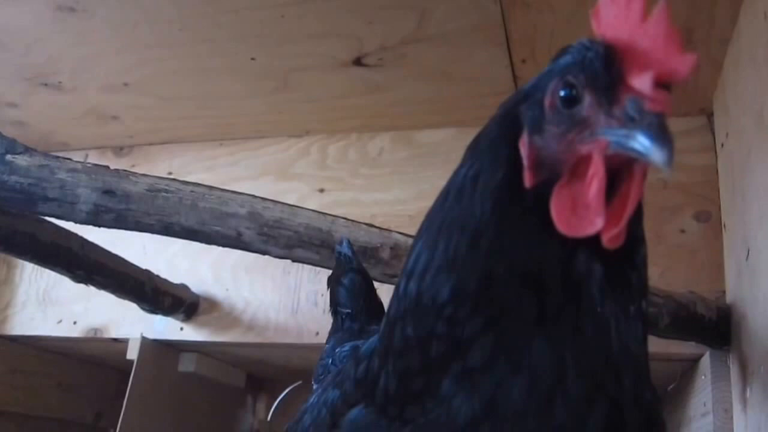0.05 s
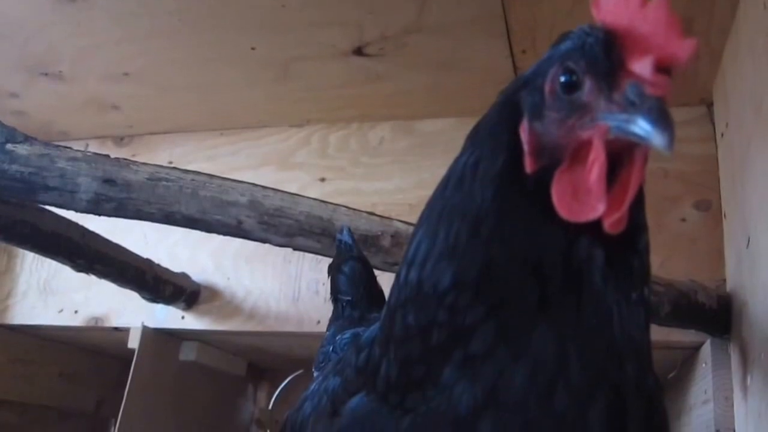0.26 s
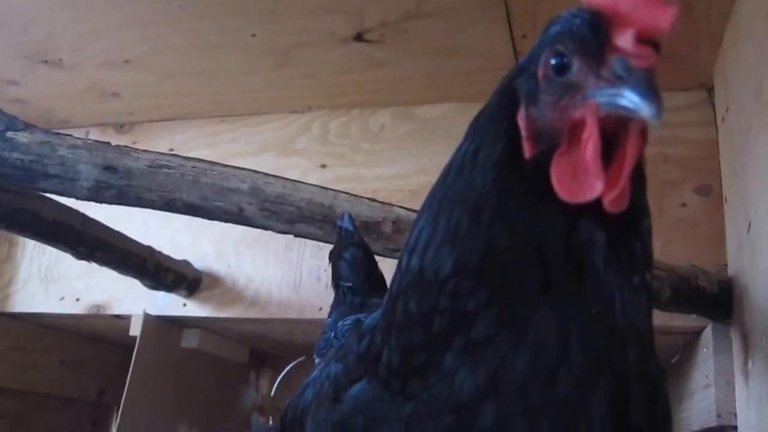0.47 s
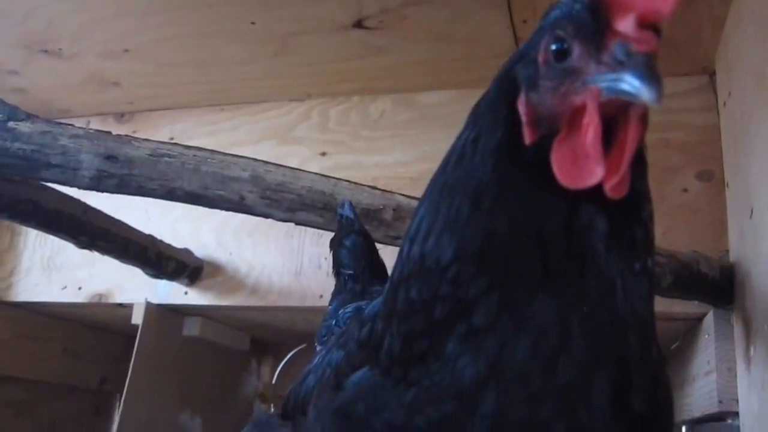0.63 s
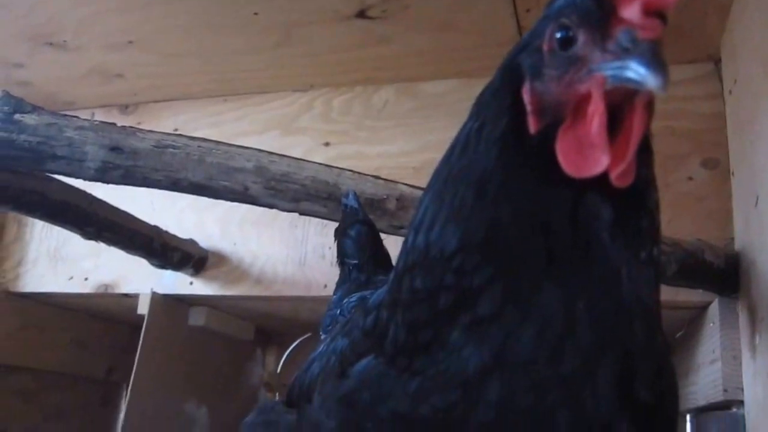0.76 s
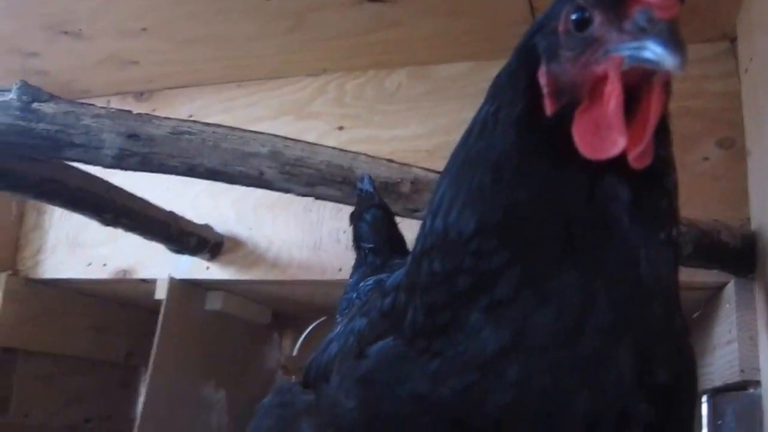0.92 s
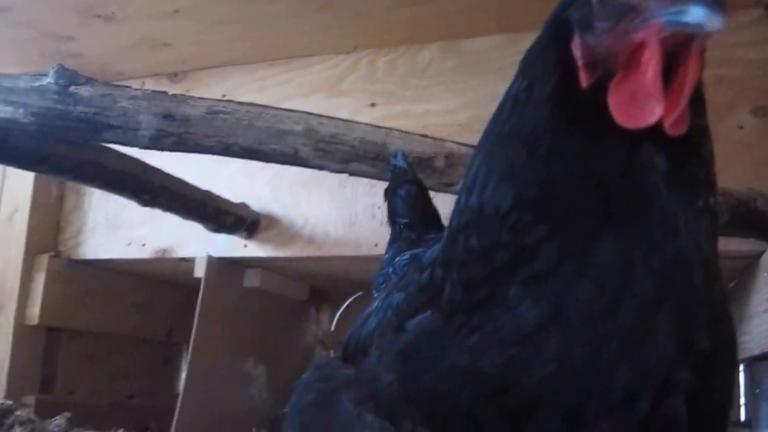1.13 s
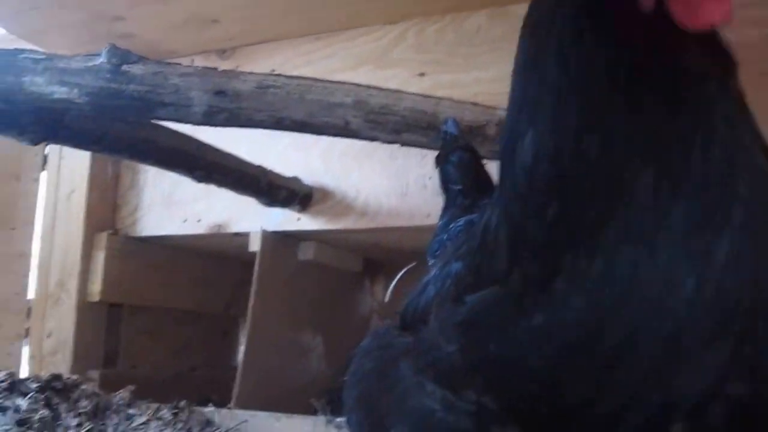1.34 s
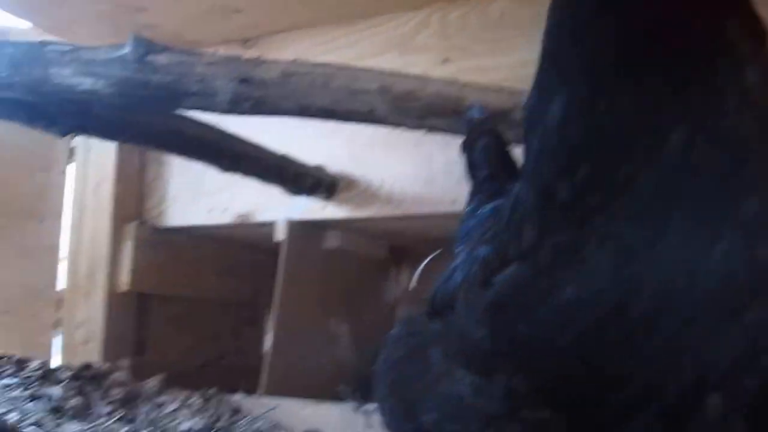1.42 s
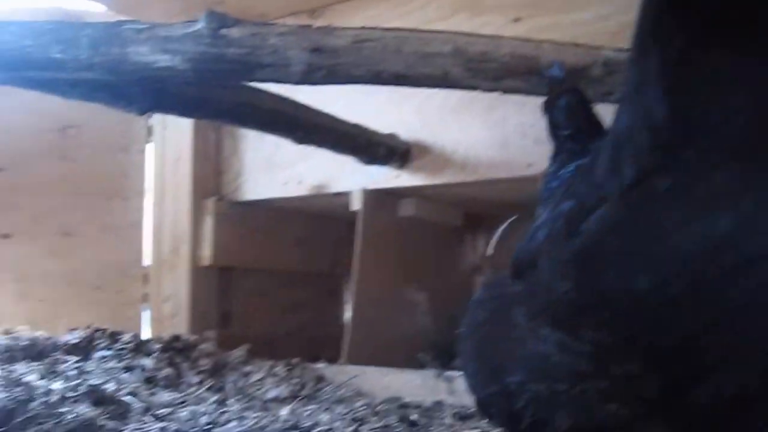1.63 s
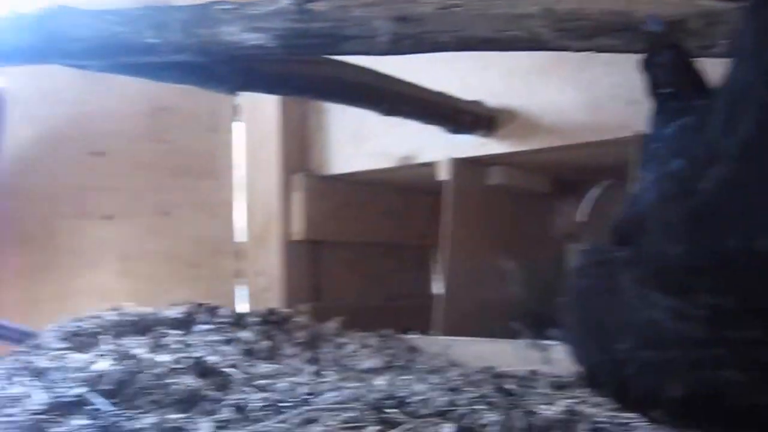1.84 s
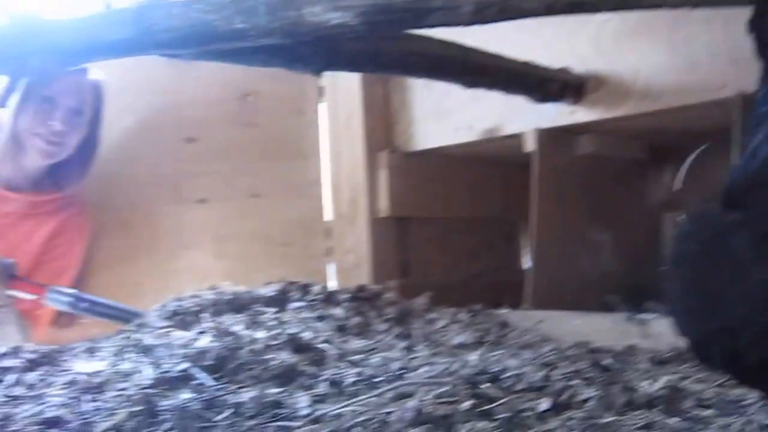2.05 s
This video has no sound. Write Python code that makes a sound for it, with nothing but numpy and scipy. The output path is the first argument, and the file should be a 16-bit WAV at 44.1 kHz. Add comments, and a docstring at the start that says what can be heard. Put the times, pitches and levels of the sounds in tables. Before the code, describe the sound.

From 0 to 0.5 s a nearby hen draws out a soft, raspy, slightly whistling call. A low motor hum and dull air continue throughout. Litter rustles faintly around 0.75 s; a distant bird calls faintly at 0.9. Five short hoarse clucks follow at about 1.1, 1.3, 1.5, 1.7 and 1.9 s, growing louder, with tiny ticks between. Knocks from 1.86 s and a close, left-leaning creak end it near 2.1.

```python
"""In a small plywood coop a hen draws out one soft, rasping call, then gives five quiet clucks that grow louder:
uneven pulses and puffs of noise ring in throat resonances. Outside, a motor hums as wavering shaft orders, with
a fluttering high sine whine above it; another bird, a glided band of noise, calls once, faintly. Shaped noise makes
the air and the rustling litter; filtered clicks make the ticks, the knocks on the camera body and, at the end,
a creak close to the microphone as the camera is turned."""
import sys
import numpy as np
from scipy import signal
from scipy.fft import rfft, irfft
from scipy.io import wavfile
from scipy.ndimage import uniform_filter1d

SR = 44100
rng = np.random.default_rng(int(sys.argv[2]) if len(sys.argv) > 2 else 0)


def generate_wav(sig):
    """Save sig (samples, or channels by samples) to the path in sys.argv[1] as 16-bit PCM at SR."""
    pcm = np.round(np.clip(np.atleast_2d(sig).T, -1, 1) * 32767).astype(np.int16)
    wavfile.write(sys.argv[1], SR, pcm)


N = 91948

# long call: pulse rate, its relative jitter, and share of puffed noise
CALL_PULSE_HZ, CALL_JITTER, CALL_AIR = 132.7, .2, .24
UPPER_WIDTH_HZ, UPPER_DB, RASP_DB = 210, -1.5, -2
TONE_OCTAVE_DB, TONE_JITTER = -9.5, .04
# clucks: jitter at full hoarseness, then total rise of low resonance and pulse rate as shares
CLUCK_JITTER, CLUCK_RISE, CLUCK_GLIDE = .27, .28, .14
CLUCK_ATTACK_S, CLUCK_RELEASE_S, LOW_WIDTH_HZ, HIGH_WIDTH_HZ = .014, .022, 220, 300
CHEST_HZ, CHEST_WIDTH_HZ, CHEST_DB = 400, 120, -16
BEAK_HZ, BEAK_WIDTH_HZ, BEAK_DB = 1700, 350, -18
# reverberation relative to the direct sound
HEN_ROOM_DB, CLICK_ROOM_DB = -7.5, -11
CASE_T60_S, CASE_DB = .012, -6
# handling and litter: overall gains, and left level over right
SLIP_DB, SLIP_PAN_DB, SLIP_LEAD_S = -2, 8, .00023
KNOCK_DB, KNOCK_PAN_DB = -5, .6
TICK_DB, TICK_PAN_DB = -26, -1.5
SHAFT_HZ, MOTOR_DRIFT, MOTOR_WAVER_DB = 17.83, .0027, -.08
WHINE_HZ, WHINE_DB, FLUTTER_HZ, FLUTTER_DEPTH = 8799, -76.5, 24, .85
# faint bird: the glide is the total rise as a share of its pitch
FAR_START_S, FAR_LENGTH_S, FAR_HZ, FAR_GLIDE, FAR_DB, FAR_WIDTH_HZ = .895, .125, 1540, .07, -60.5, 150
AIR_DB, AIR_PATCH_DB = -44.5, 1.5
NOTCH_HZ, NOTCH_WIDTH_HZ, EDGE_HZ = 8237, 327, 15950


def amp(db):
    """Decibels to gain."""
    return 10 ** (np.asarray(db) / 20)


def unit(x):
    """Scales to rms 1."""
    return x / np.sqrt(np.mean(x ** 2) + 1e-20)


def curve(rows, t, axis=1):
    """Reads one column of a table over time."""
    rows = np.array(rows)
    return np.interp(t, rows[:, 0], rows[:, axis])


def spectrum(rows, hz):
    """Reads a table over log frequency."""
    f, value = np.transpose(rows)
    return np.interp(np.log(hz + 1), np.log(f), value)


def add(mix, s, sound):
    """Mixes a sound in at time s."""
    part = mix[max(round(s * SR), 0):][:len(sound)]
    part += sound[:len(part)]


def wander(size, hz):
    """Slow random motion: noise of rms 1 over the whole scene, low-passed near hz, cut to size."""
    f = np.fft.rfftfreq(N, 1 / SR)
    return unit(irfft(rfft(rng.standard_normal(N)) * np.exp(-(f / hz) ** 2), N))[:size]


def resonate(x, hz, width):
    """A steep resonance of gain 1 that may glide: shift its centre to 0 Hz, low-pass, shift back."""
    turn = np.exp(2j * np.pi * np.cumsum(hz * np.ones(len(x))) / SR)
    r = np.exp(-np.pi * width / SR)
    smooth = signal.lfilter([(1 - r) ** 2], [1, -2 * r, r * r], x / turn)
    return 2 * (turn * smooth).real


def syrinx(pulse_hz, jitter, air):
    """The voice source: pulses of uneven timing and strength, each with a fading puff of noise."""
    size = len(pulse_hz)
    turns = np.cumsum(pulse_hz * (1 + jitter * wander(size, 90))) / SR
    pulses = np.diff(np.floor(turns), prepend=0) * amp(2.6 * wander(size, 225))
    puffs = np.exp(-(turns % 1) / 1.35) * rng.standard_normal(size)
    return (1 - air) * unit(pulses - pulses.mean()) + air * unit(puffs)


def long_call():
    """A rasp through the throat resonances, with a wavering tone and its octave inside it."""
    # the rasp: t/s, level/dB before RASP_DB, upper resonance f/Hz, middle resonances' level/dB
    rasp_shape = [(0, -47.5, 1200, -6), (.05, -43.5, 1175, 1), (.11, -43, 1095, -1), (.145, -43, 1160, 8),
                  (.17, -43, 1180, 5), (.235, -37, 1104, -0.5), (.26, -42, 1120, -6),
                  (.3, -38.5, 1140, 4.5), (.335, -42.5, 1121, 3.5), (.36, -42, 1141, -2),
                  (.42, -38.5, 1191, 5.5), (.465, -42.5, 1201, -5), (.512, -44.5, 1200, 14),
                  (.535, -82, 1221, 9)]
    # the whistled tone: t/s, f/Hz, level/dB
    whistle = [(0, 581.7, -43), (.05, 571.7, -47), (.08, 532.4, -42.5), (.115, 538, -45.5),
               (.145, 554, -55), (.175, 530.6, -39), (.2, 537.3, -52), (.235, 553.5, -47),
               (.32, 533.2, -46), (.335, 540.3, -47), (.365, 544, -45.5), (.425, 542.5, -46),
               (.46, 548.7, -56), (.53, 555, -65)]
    # fixed outer resonances of the throat: f/Hz, width/Hz, level/dB
    outer = [(535, 132, -3.5), (1750, 380, -18.5), (2123, 100, -20.5), (3840, 390, -29)]
    # middle resonances of the throat: f/Hz, width/Hz, level/dB before their change over time
    middle = [(660, 70, 3), (750, 80, -3), (875, 70, -7)]
    t = np.arange(0, rasp_shape[-1][0], 1 / SR)
    drive = syrinx(CALL_PULSE_HZ * np.ones(len(t)), CALL_JITTER, CALL_AIR)
    rasp = sum(amp(db) * resonate(drive, hz, width) for hz, width, db in outer)
    middle_voice = sum(amp(db) * resonate(drive, hz, width) for hz, width, db in middle)
    rasp = rasp + amp(curve(rasp_shape, t, axis=3)) * middle_voice
    rasp = rasp + amp(UPPER_DB) * resonate(drive, curve(rasp_shape, t, axis=2), UPPER_WIDTH_HZ)
    # even out the loudness before the table shapes it
    rasp = rasp / np.sqrt(uniform_filter1d(rasp ** 2, size=1500) + 1e-12)
    tone_hz = curve(whistle, t) * (1 + TONE_JITTER * wander(len(t), 114))
    phase = 2 * np.pi * np.cumsum(tone_hz) / SR
    tone = unit(np.sin(phase) + amp(TONE_OCTAVE_DB) * np.sin(2 * phase))
    return rasp * amp(curve(rasp_shape, t) + RASP_DB) + tone * amp(curve(whistle, t, axis=2))


def cluck(length, db, pulse_hz, low_hz, high_hz, high_db, hoarse):
    """A short hoarse note whose pitch and low resonance rise as the throat opens."""
    t = np.arange(0, length, 1 / SR)
    opening = t / length - .5
    drive = syrinx(pulse_hz * (1 + CLUCK_GLIDE * opening), CLUCK_JITTER * hoarse, hoarse)
    throat = [(CHEST_HZ, CHEST_WIDTH_HZ, CHEST_DB),
              (low_hz * (1 + CLUCK_RISE * opening), LOW_WIDTH_HZ, 0),
              (high_hz, HIGH_WIDTH_HZ, high_db),
              (BEAK_HZ, BEAK_WIDTH_HZ, BEAK_DB)]
    voice = sum(amp(level) * unit(resonate(drive, hz, width)) for hz, width, level in throat)
    attack = np.minimum(t / CLUCK_ATTACK_S, 1)
    release = np.minimum((length - t) / CLUCK_RELEASE_S, 1)
    return amp(db) * unit(voice) * attack * release


def hen():
    """The long call and the clucks, direct and off the walls of the coop."""
    # clucks: t/s, length/s, level/dB before the fades, mid-note pulse rate f/Hz, mid-note low resonance f/Hz,
    # high resonance f/Hz, its level/dB, hoarseness/0-1
    clucks = [(1.074, .054, -44.5, 333, 660, 1050, -17, .2), (1.289, .063, -44, 280, 620, 1130, -3, .22),
              (1.505, .079, -42, 380, 780, 1180, -1, .4), (1.726, .074, -39, 408, 880, 1190, 0, .4),
              (1.926, .048, -34.5, 322, 650, 1130, -8, .18)]
    voice = np.zeros(N)
    add(voice, 0, long_call())
    for start, *shape in clucks:
        add(voice, start, cluck(*shape))
    return voice + amp(HEN_ROOM_DB) * coop(voice)


def coop(x):
    """Short reverberation between plywood walls: fading noise, alike in both ears at low pitch."""
    # decay of the coop: f/Hz, time to fall 60 dB/s
    decay_times = [(100, 0.75), (700, 0.25), (3000, 0.06), (12000, 0.24)]
    hz, t, z = signal.stft(rng.standard_normal((2, SR // 3)), SR, nperseg=256)
    fade = amp(-60 * t / spectrum(decay_times, hz)[:, None])
    tail = signal.istft(pair(z, hz) * fade, SR, nperseg=256)[1]
    tail[:, :SR // 500] = 0  # no reflection in the first 2 ms
    return signal.fftconvolve(x[None], tail / np.linalg.norm(tail[0]), axes=1)[:, :N]


def pair(z, hz):
    """Turns two unrelated spectra into a partly alike left and right."""
    # likeness of the two microphone ports: f/Hz, left-right likeness/0-1
    likeness = [(30, 0.93), (300, 0.72), (1000, 0.73), (2000, 0.44), (4000, 0.083), (15000, 0.12)]
    c = spectrum(likeness, hz)[:, None]
    mid = np.sqrt((1 + c) / 2) * z[0]
    side = np.sqrt((1 - c) / 2) * z[1]
    return np.array([mid + side, mid - side])


def impulse(colour, size=2048):
    """The shortest causal click with a given spectrum (minimum phase)."""
    log_gain = np.log(amp(spectrum(colour, abs(np.fft.fftfreq(size, 1 / SR)))))
    return np.fft.ifft(np.exp(np.conj(signal.hilbert(log_gain)))).real[:size // 2]


def clicks(rows, colour, gain_db, pan_db):
    """Sharp pushes that ring briefly in the camera's case and echo in the coop."""
    train = np.zeros(N)
    for s, db in rows:
        add(train, s, amp(db + gain_db) * impulse(colour))
    t = np.arange(SR // 40) / SR
    case = rng.standard_normal((2, len(t))) * amp(-60 * t / CASE_T60_S) * (1 - np.exp(-t / .00075))
    case = case / np.linalg.norm(case, axis=1, keepdims=True)
    ring = signal.fftconvolve(train[None], case, axes=1)[:, :N]
    close = (train + amp(CASE_DB) * ring) * amp([[pan_db / 2], [-pan_db / 2]])
    return close + amp(CLICK_ROOM_DB) * coop(train)


def creak():
    """A run of slips, each one filtered click, louder and earlier at the nearer left port."""
    # slips: t/s, level/dB before SLIP_DB
    slips = [(1.9472, -15), (1.9555, -12), (1.9638, -12), (1.9892, -15), (2.0034, -13), (2.0154, -8),
             (2.0254, -3), (2.0338, 1.5), (2.0422, 2), (2.0511, .5), (2.0622, -3), (2.0745, -6)]
    # spectrum of one slip: f/Hz, level/dB
    slip_colour = [(60, -21), (300, 2.5), (900, -1), (1550, -7.5), (2000, -11), (2400, -5), (3900, -7),
                   (5000, -14), (6200, -8), (7500, -20), (9500, -25), (12000, -23), (16000, -40)]
    left, right = clicks(slips, slip_colour, SLIP_DB, SLIP_PAN_DB)
    t = np.arange(N) / SR
    return np.array([left, np.interp(t - SLIP_LEAD_S, t, right)])


def knocks():
    """Knocks on the camera body, each one filtered click."""
    # knocks: t/s, level/dB before KNOCK_DB
    hits = [(1.8598, -11.5), (1.8784, -11), (1.9728, 0.5)]
    # spectrum of one knock: f/Hz, level/dB
    hit_colour = [(50, -6), (300, 10.5), (950, 9.5), (1600, -8), (3300, -4), (5000, -15), (7500, -19),
                  (11000, -21), (16000, -37)]
    return clicks(hits, hit_colour, KNOCK_DB, KNOCK_PAN_DB)


def ticks():
    """Bright ticks in the litter, each one filtered click."""
    # ticks: t/s, level/dB before TICK_DB
    snaps = [(1.3075, -2.5), (1.3895, -1), (1.4518, 2), (1.9752, 5), (1.9778, 8.5)]
    # spectrum of one tick: f/Hz, level/dB
    snap_colour = [(200, -23), (2500, -14), (4200, -7), (6500, -8), (9000, -5), (11000, -5), (13000, -15),
                   (16000, -25)]
    return clicks(snaps, snap_colour, TICK_DB, TICK_PAN_DB)


def hum():
    """Sines at multiples of a drifting motor shaft speed, in phase at both ports."""
    # shaft orders: multiple of the shaft speed, level/dB before the swell
    orders = [(3, -50.5), (4, -48), (6, -58.5), (8, -41.5), (9, -47), (12, -54.5), (16, -50.5), (18, -66.5),
              (20, -60.5), (24, -67)]
    # slow swell: t/s, 4th order's level/dB, level/dB of the 12th order and above
    swell = [(0, -2.5, 3), (.7, -6, 0.5), (1.1, 3, -4.5), (1.35, 3.5, -1.5), (1.7, 5, 3), (2.08, 3.5, 1)]
    t = np.arange(N) / SR
    turns = np.cumsum(SHAFT_HZ * (1 + MOTOR_DRIFT * wander(N, 2.53))) / SR
    out = np.zeros(N)
    for order, db in orders:
        level = db + MOTOR_WAVER_DB * wander(N, 4)
        if order == 4:
            level = level + curve(swell, t)
        if order > 10:
            level = level + curve(swell, t, axis=2)
        out += amp(level) * unit(np.sin(2 * np.pi * (order * turns + rng.random())))
    return out * amp([[-.4], [.4]])  # gains in dB: left -0.4 dB, right +0.4 dB


def whine():
    """A thin high sine whose phase, and so pitch, flutters."""
    t = np.arange(N) / SR
    flutter = np.angle(1 + FLUTTER_DEPTH * np.exp(2j * np.pi * FLUTTER_HZ * t))
    return amp(WHINE_DB) * unit(np.sin(2 * np.pi * WHINE_HZ * t + flutter))


def far_note():
    """A bird farther off: narrow noise that swells, rises a little and fades, heard only as reverberation."""
    t = np.arange(0, FAR_LENGTH_S, 1 / SR)
    share = t / FAR_LENGTH_S
    note = resonate(rng.standard_normal(len(t)), FAR_HZ * (1 + FAR_GLIDE * (share - .5)), FAR_WIDTH_HZ)
    out = np.zeros(N)
    add(out, FAR_START_S, amp(FAR_DB) * unit(note * np.sin(np.pi * share)))
    return coop(out)


def background():
    """Dull outdoor air with faint patches, and the rustle of litter and feathers, both shaped noise."""
    # spectrum of the air: f/Hz, relative density/dB per Hz
    air_colour = [(15, -14), (30, -9.5), (50, 5.5), (80, 7), (120, -2), (200, -4.5), (280, -1.5),
                  (400, -10), (600, -8.5), (900, -11.5), (1500, -14), (2200, -21.5), (4000, -26.5),
                  (7000, -31.5), (10000, -34.5), (16000, -38.5)]
    # swell of the air: t/s, level/dB relative to AIR_DB
    air_swell = [(0, 1), (.6, -0.5), (1, -0.5), (1.4, 0), (1.8, 1), (2.08, 3.5)]
    # rustle: t/s, level/dB
    rustle_level = [(0, -80), (.66, -61), (.74, -54), (.84, -59.5), (.95, -61), (1.03, -58.5), (1.15, -64),
                    (1.31, -64), (1.6, -76), (1.9, -75), (1.97, -51.5), (2.08, -74)]
    # spectrum of the rustle: f/Hz, relative level/dB
    rustle_colour = [(100, -23), (1500, 17), (4000, 14), (7000, 4), (11000, 5), (16000, -6)]
    hz, _, z = signal.stft(rng.standard_normal((4, N)), SR, nperseg=2048)
    # smoothing over frequency, then time, leaves broad patches
    patches = uniform_filter1d(rng.standard_normal(z.shape[1:]), size=14, axis=0)
    patches = unit(uniform_filter1d(patches, size=5, axis=1))
    air = pair(z[:2], hz) * amp(spectrum(air_colour, hz)[:, None] + AIR_PATCH_DB * patches)
    rustle = z[2:] * amp(spectrum(rustle_colour, hz))[:, None]
    air = unit(signal.istft(air, nperseg=2048)[1][:, :N])
    rustle = unit(signal.istft(rustle, nperseg=2048)[1][:, :N])
    t = np.arange(N) / SR
    return amp(AIR_DB + curve(air_swell, t)) * air + amp(curve(rustle_level, t)) * rustle


def notch(x):
    """The microphone is deaf in one narrow treble band."""
    hz = np.fft.rfftfreq(N, 1 / SR)
    offset = ((hz - NOTCH_HZ) / NOTCH_WIDTH_HZ) ** 2
    return irfft(rfft(x) * (offset / (1 + offset)) ** 2, N)


def scene():
    """All sources at the two microphone ports; the whine alone is added past the notch."""
    handling = creak() + knocks() + ticks()
    return notch(hen() + handling + hum() + far_note() + background()) + whine()


def record(dry):
    """The recorder's band limit: a steep low-pass."""
    lowpass = signal.firwin(511, EDGE_HZ, window=("kaiser", 9), fs=SR)
    return signal.oaconvolve(dry, lowpass[None], "same")


dry = scene()
out = record(dry)
generate_wav(out)
```